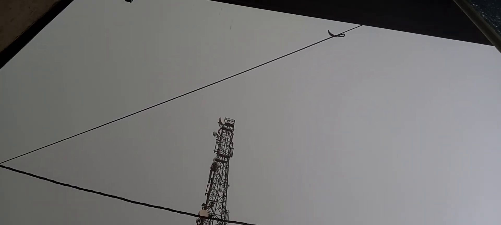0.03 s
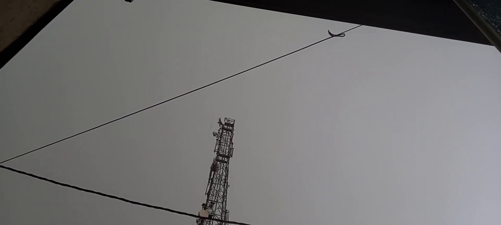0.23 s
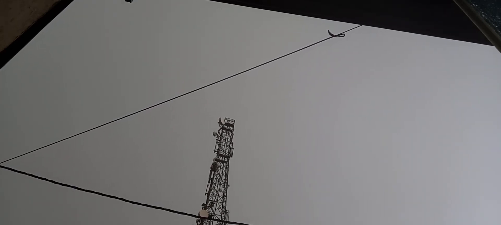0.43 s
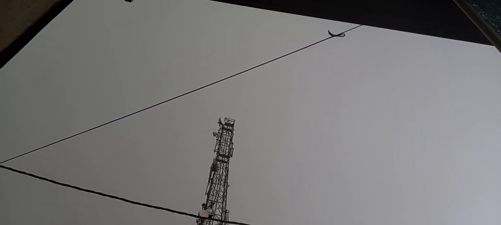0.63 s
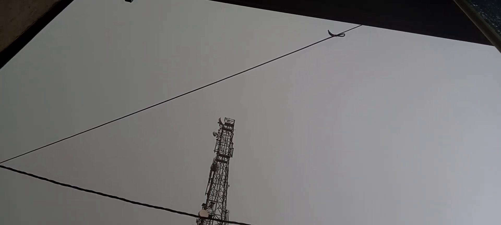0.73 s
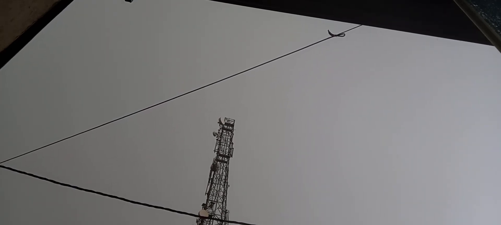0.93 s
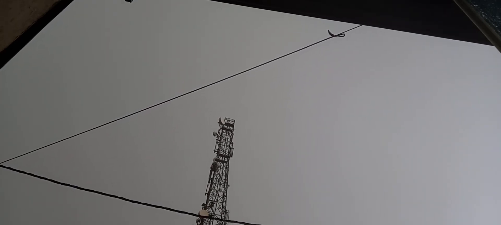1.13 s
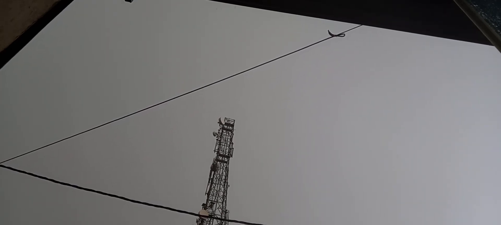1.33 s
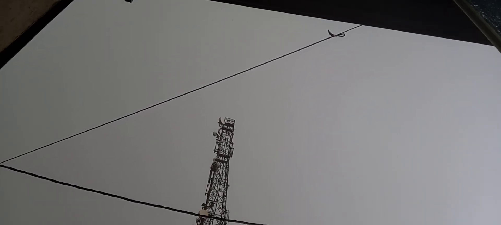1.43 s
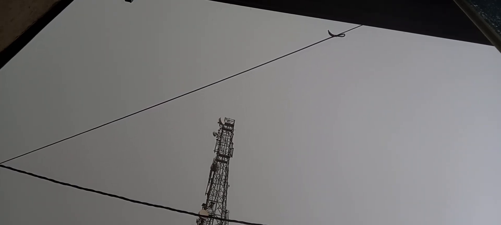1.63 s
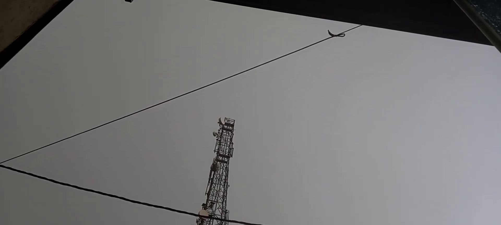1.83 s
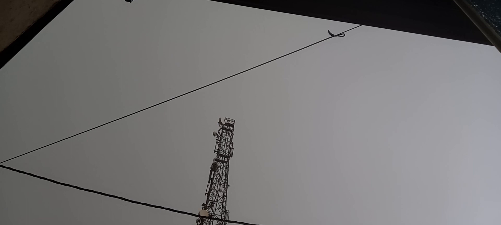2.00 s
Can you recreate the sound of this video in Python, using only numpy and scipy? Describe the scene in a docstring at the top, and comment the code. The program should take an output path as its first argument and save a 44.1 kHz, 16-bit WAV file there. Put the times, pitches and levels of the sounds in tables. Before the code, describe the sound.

Thunder rumbles in low uneven thumps over steady rain, then swells into a loud deep boom

```python
"""Under a roof edge in steady rain: noise makes a far hiss, noise puffs a patter of fine drops, filtered
noise clicks and short decaying tones the single near drips, each with a wall echo.
Thunder rolls in short low tones over rumbling noise, then swells into a loud boom: a wavering low note
that rings the sheltered space, with a deeper one below. One more low tone is a bump at the right microphone.
Two microphones a hand apart; the recorder's gain control turns the rain down under the boom."""
import sys
import numpy as np
from scipy import signal
from scipy.fft import rfft, irfft, next_fast_len
from scipy.io import wavfile
from scipy.ndimage import uniform_filter1d, map_coordinates

SR = 44100
rng = np.random.default_rng(int(sys.argv[2]) if len(sys.argv) > 2 else 0)


def rack_gain(trim_db):
    """Turn a fader trim in dB into the linear factor to multiply a signal by."""
    fader = np.asarray(trim_db, float)
    return 10 ** (fader / 20)


def unload_wav(signal):
    """Save mono or channel-first audio to the path in sys.argv[1] as 16-bit WAV at rate SR, clipped to [-1, 1]."""
    wavfile.write(
        sys.argv[1],
        SR,
        np.round(np.clip(np.atleast_2d(signal).T, -1, 1) * 32767).astype(np.int16),
    )


N = 90978

# rain body level: (time [s], level [dB])
RAIN_LEVEL = [(0.0, -44), (1.34, -45), (1.66, -44), (1.97, -45.5), (2.06, -43.5)]
# rain treble level: (time [s], level [dB])
FIZZ_LEVEL = [(0.0, -54), (0.22, -53), (1.2, -56.5), (1.73, -57), (1.9, -69), (2.06, -61)]
# rain body spectrum: (frequency [Hz], gain [dB])
HISS_COLOUR = [(440, -21), (750, -4), (935, -1), (1090, -5.5), (1180, -3), (2340, -6), (2920, -8),
               (3750, -8), (4250, -10.5), (6350, -7), (7400, -23.5), (9620, -34), (16300, -120)]
# rain treble spectrum: (frequency [Hz], gain [dB])
FIZZ_COLOUR = [(5000, -55), (7400, -7), (9800, 5), (12200, 5.5), (14400, 2.5), (16500, 0.5)]
# rain stereo, before the lag between microphones: (frequency [Hz], left-right likeness [0-1])
RAIN_ALIKE = [(800, 0.12), (1300, 0.11), (5000, 0.31), (15000, 0.21)]
# thunder thumps, and near 1.09 s a bump at the right microphone:
# (crest time [s], tone level [dB], pitch [Hz], length [s])
THUMPS = [(.005, -25.5, 81, 0.052), (0.04, -27, 78.3, 0.047), (0.08, -26, 84.7, 0.1),
          (0.189, -27.5, 86.4, 0.059), (0.244, -29.5, 93.8, 0.022), (0.304, -26, 68.2, 0.047),
          (0.307, -30.5, 128.3, 0.05), (0.344, -33, 80.3, 0.035), (0.389, -22, 94.8, 0.0218),
          (0.424, -24.5, 83.14, 0.074), (0.502, -19.5, 82.45, 0.038), (0.551, -24.5, 75.94, 0.045),
          (0.596, -25.5, 69.9, 0.026), (0.671, -26.5, 92, 0.049), (0.858, -32.5, 82, 0.12),
          (0.939, -32.5, 86.2, 0.026), (1.028, -40, 105.6, 0.19), (1.096, -27.5, 90.5, 0.039),
          (1.291, -32, 82.3, 0.083), (1.404, -23, 85, 0.055), (1.44, -28.5, 86.2, 0.057),
          (1.49, -31, 85, 0.076), (1.558, -37, 98.9, 0.052), (1.586, -29.5, 90.4, 0.064),
          (1.62, -29.5, 101.8, 0.031), (1.769, -16, 137.6, 0.021)]
# left-right balance of the thumps and the bump: (time [s], left minus right [dB])
THUMP_BALANCE = [(0, 1), (.72, 5.5), (.96, -4), (1.09, -24), (1.3, 5), (1.5, -5.5)]
# far rumble and roar between thumps: (frequency [Hz], gain [dB])
MURMUR_COLOUR = [(15, -47), (25, -12.5), (62, 3), (91, 1), (204, -42), (291, -13), (556, -16), (781, -20.5),
                 (1000, -33.5), (1300, -57), (2200, -120)]
# grainy upper rumble, before its surges: (time [s], level [dB])
GROWL_LEVEL = [(0.0, -45), (0.49, -40), (1.03, -47.5), (1.06, -40.5), (1.23, -49.5), (1.51, -41.5),
               (1.78, -38), (2.06, -33)]
# grainy upper rumble spectrum: (frequency [Hz], gain [dB])
GROWL_COLOUR = [(88, -7), (150, 3), (204, -6.5), (264, -6), (356, -4.5), (446, -6.5), (514, -12.5),
                (700, -22), (910, -56), (1540, -120)]
# murmur and growl stereo: (frequency [Hz], left-right likeness [0-1])
BASS_ALIKE = [(50, 0.17), (90, 0.25), (160, 0.093), (300, 0.78), (550, 0.71), (900, 0.91)]
# rolling noise above the boom: (time [s], lower band level [dB], upper band level [dB])
STRAND_LEVELS = [(1.64, -50, -46), (1.68, -34, -36), (1.745, -35, -38), (1.77, -26, -33), (1.83, -29, -35),
                 (1.91, -31, -35), (1.945, -28, -34), (2.06, -30, -37)]
# lower band of the rolling noise: (frequency [Hz], gain [dB])
LOWER_STRAND_COLOUR = [(95, -40), (115, 11), (190, 1.5), (230, -66)]
# upper band of the rolling noise: (frequency [Hz], gain [dB])
UPPER_STRAND_COLOUR = [(190, -25), (225, 3.5), (275, 6), (360, -35.5)]
# rolling noise stereo: (frequency [Hz], left-right likeness [0-1])
STRAND_ALIKE = [(200, .85)]
# drips coloured by the microphone's resonance near 6 kHz:
# (time [s], burst peak before the treble cut [dB], resonance [Hz])
COLOURED_DRIPS = [(0.0522, -24, 5760), (0.0966, -32, 5840), (0.1087, -28, 6060), (0.1451, -29.5, 6170),
                  (0.2359, -33, 6340), (0.258, -25.5, 5900), (0.2957, -29, 6200), (0.5162, -25, 6360),
                  (0.5825, -29.5, 5840), (1.1004, -33, 6260), (1.7995, -22.5, 6360), (1.8298, -40, 5900),
                  (1.887, -32, 6400), (2.0428, -22, 6240)]
# bright drips: (time [s], burst peak before the bass cut [dB], band centre [Hz])
TICKS = [(0.061, -32.5, 10600), (0.1101, -29.5, 12800), (0.2125, -33.5, 13000), (0.2345, -32, 12500),
         (0.264, -33, 12100), (0.2968, -25.5, 11500), (0.305, -26, 12300), (0.5208, -26, 9500),
         (0.5823, -23.5, 14500), (0.607, -32, 12100), (0.61, -29.5, 10100), (0.8769, -40, 11900),
         (1.0805, -24.5, 13000), (1.549, -32, 10500), (1.7434, -40, 11000), (1.7522, -29, 10000),
         (1.7772, -31.5, 12000), (1.7995, -24, 12900), (1.842, -38, 9300)]
# fat drips: (time [s], peak [dB], pitch [Hz])
PLOPS = [(.58, -29.5, 2050), (1.1202, -36.5, 1820)]
# boom note: (time [s], level [dB], pitch before its waver [Hz])
BOOM = [(1.64, -45, 70.57), (1.665, -32.5, 69.4), (1.7, -16.5, 76.2), (1.725, -29.5, 99.8),
        (1.745, -18.5, 83), (1.762, -25, 88.2), (1.778, -18, 101.4), (1.803, -11, 79), (1.826, -17, 83),
        (1.858, -14, 97.7), (1.874, -16, 100.6), (1.892, -12.5, 97.1), (1.948, -8, 90.3),
        (1.99, -9.5, 89.4), (2.01, -32, 90.3), (2.03, -8.5, 98.1), (2.06, -12.5, 91.2)]
# deeper part of the boom, before its waver: (time [s], level [dB])
UNDER_LEVEL = [(1.64, -49), (1.69, -22.5), (1.74, -37), (1.8, -22), (1.86, -21.5), (1.922, -28),
               (2.06, -20)]

LAG_S = 0.000455  # rain and drips reach the left microphone first
PATTER_DB, SPRAY_DB = -6.5, -17  # grains re their hiss
THUMP_EDGE_DB, THUMP_EDGE_RATIO = -12.5, 1.4  # weaker, higher tone on each thump
MURMUR_DB = -40.5
GROWL_SURGE_DB, SURGE_AT_DB = 3, -24.5  # full surge; thump size for half of it
ECHO_S, ECHO_DB = 0.0032, -14  # near wall
UNDER_HZ, UNDER_WAVER_HZ = 60, 5
BASS_CUT_HZ, TOP_HZ = 20.5, 15850  # microphone band limits
AGC_FROM_DB, AGC_CUT_DB_PER_DB, AGC_S = -18.5, 0.73, 0.15


def unit(x):
    """Scale to rms 1."""
    return x / np.sqrt(np.mean(x ** 2) + 1e-20)


def along(points, hz):
    """Interpolate (frequency [Hz], value) points on a log frequency axis."""
    point_hz, value = np.transpose(points)
    return np.interp(np.log(hz + 1), np.log(point_hz + 1), value)


def curves(rows):
    """One value per sample for each column after the time."""
    time_s, *columns = np.transpose(rows)
    return [np.interp(np.arange(N) / SR, time_s, column) for column in columns]


def wobble(rate_hz):
    """Smooth random curve through rate_hz knots a second."""
    knots = rng.standard_normal(int(N * rate_hz / SR) + 4)
    return map_coordinates(knots, [np.arange(N) * rate_hz / SR])


def filtered(x, response):
    """Multiply the spectrum of x by response(hz)."""
    size = next_fast_len(N + SR // 2)
    hz = np.fft.rfftfreq(size, 1 / SR)
    return irfft(rfft(x, size) * response(hz), size)[..., :N]


def lagged(pair):
    """Arrival lag: left half of LAG_S early, right half late."""
    sign = np.array([[1], [-1]])
    return filtered(pair, lambda hz: np.exp(1j * np.pi * hz * LAG_S * sign))


def spread(pair, colour, alike):
    """Colour two unrelated signals and mix them to a stereo likeness, rms 1."""
    def response(hz):
        angle = np.arccos(np.clip(along(alike, hz), -1, 1)) / 2
        return rack_gain(along(colour, hz)) * [np.cos(angle), np.sin(angle)]

    mid, side = filtered(pair, response)
    return unit(np.array([mid + side, mid - side]))


def patchy(depth_db):
    """Two noises sharing time-frequency patches of random gain."""
    z = signal.stft(rng.standard_normal((2, N)), nperseg=256)[2]
    field = rng.standard_normal(z.shape[1:])
    field = uniform_filter1d(field, size=5, axis=0)  # across frequency
    field = uniform_filter1d(field, size=6, axis=1)  # across time
    return signal.istft(z * rack_gain(depth_db * unit(field)), nperseg=256)[1][:, :N]


def impacts(count, uneven_db, most_db, decay_s):
    """Two noise trains with shared random impacts; their power jumps, then decays exponentially."""
    place, chance = rng.random((count, 2)).T
    size = rack_gain(np.minimum(-uneven_db * np.log(chance + 1e-4), most_db))
    train = np.bincount((place * N).astype(int), size ** 2, N)
    decay = np.exp(-np.arange(2000) / (decay_s * SR))
    power = abs(signal.fftconvolve(train, decay)[:N])
    return np.sqrt(power) * rng.standard_normal((2, N))


def rain():
    """Many far drops merge into noise; grains of nearer drops lie on body and treble."""
    (body_db,), (fizz_db,) = curves(RAIN_LEVEL), curves(FIZZ_LEVEL)
    hiss = spread(patchy(depth_db=2.5), HISS_COLOUR, RAIN_ALIKE)
    drops = impacts(count=400, uneven_db=1, most_db=8, decay_s=0.0025)
    body = hiss + rack_gain(PATTER_DB) * spread(drops, HISS_COLOUR, RAIN_ALIKE)
    fizz = spread(rng.standard_normal((2, N)), FIZZ_COLOUR, RAIN_ALIKE)
    fine_drops = impacts(count=300, uneven_db=10, most_db=-6, decay_s=0.0017)
    top = fizz + rack_gain(SPRAY_DB) * spread(fine_drops, FIZZ_COLOUR, RAIN_ALIKE)
    flutter_db = 0.086 * wobble(20.1)
    return lagged(rack_gain(flutter_db) * (rack_gain(body_db) * body + rack_gain(fizz_db) * top))


def thunder_and_bump():
    """Thumps and boom over three layers of rumbling noise; the bump near 1.09 s is almost all right."""
    thump = thumps()
    low = thump + boom()
    # a delayed copy of drifting sign and size sets the channels apart
    side = rack_gain(-14) * np.roll(low, 150) * np.sin(1.6 * wobble(11))
    balance_db, = curves(THUMP_BALANCE)
    side = side + np.tanh(balance_db * np.log(10) / 40) * thump
    return np.array([low + side, low - side]) + murmur() + growl(thump) + strands()


def thumps():
    """Each thump or bump is a short low tone and a weaker, higher one under a raised-cosine swell."""
    out, t = np.zeros(N), np.arange(N) / SR
    for crest_s, level_db, pitch_hz, length_s in THUMPS:
        phase = 2 * np.pi * rng.random(2)
        swell = np.cos(np.pi / 2 * np.clip(2 * (t - crest_s) / length_s, -1, 1)) ** 2
        tone = np.sin(2 * np.pi * pitch_hz * t + phase[0])
        edge = rack_gain(THUMP_EDGE_DB) * np.sin(2 * np.pi * THUMP_EDGE_RATIO * pitch_hz * t + phase[1])
        out += rack_gain(level_db) * swell * (tone + edge)
    return out


def murmur():
    """Far rumble and roar: steady coloured noise."""
    return rack_gain(MURMUR_DB) * spread(rng.standard_normal((2, N)), MURMUR_COLOUR, BASS_ALIKE)


def growl(thump):
    """Grainy rumble of decaying noise puffs that surges with the thumps."""
    size = abs(uniform_filter1d(abs(thump), size=900))
    surge_db = GROWL_SURGE_DB * size / (size + rack_gain(SURGE_AT_DB))
    grains = impacts(count=500, uneven_db=0, most_db=6, decay_s=0.032)
    return rack_gain(curves(GROWL_LEVEL)[0] + surge_db) * spread(grains, GROWL_COLOUR, BASS_ALIKE)


def strands():
    """Rolling noise in two bands, faint until it swells with the boom."""
    lower_db, upper_db = curves(STRAND_LEVELS)
    lower = spread(rng.standard_normal((2, N)), LOWER_STRAND_COLOUR, STRAND_ALIKE)
    upper = spread(rng.standard_normal((2, N)), UPPER_STRAND_COLOUR, STRAND_ALIKE)
    return rack_gain(lower_db) * lower + rack_gain(upper_db) * upper


def drips(rows, rise_s, width, splash_db, splash_t60_s):
    """Each drip: a noise click, its wall echo and a fading splash through a band-pass."""
    out, t = np.zeros((2, N + SR)), np.arange(SR // 20) / SR
    hz = np.fft.rfftfreq(len(t), 1 / SR)

    def click(after_s):
        u = np.maximum(after_s, 0) / rise_s
        return u * np.exp(1 - u)

    splash = rack_gain(splash_db - 60 * t / splash_t60_s)
    shape = click(t) + rack_gain(ECHO_DB) * click(t - ECHO_S) + splash
    for time_s, peak_db, centre_hz in rows:
        shared, *own = rng.standard_normal((3, len(t)))
        noise = shared + 1.46 * np.array(own)
        damping = 1j * hz * width * centre_hz  # width: bandwidth / centre, per stage
        stage = damping / (centre_hz ** 2 - hz ** 2 + damping)
        burst = irfft(rfft(noise * shape) * stage ** 2, len(t))
        start = round(time_s * SR)
        out[:, start:start + len(t)] += burst / abs(burst).max() * rack_gain(peak_db)
    return lagged(out[:, :N])


def coloured_drips():
    """Drips coloured by the microphone's resonance near 6 kHz: narrow band, long splash, treble cut."""
    narrow = drips(COLOURED_DRIPS, rise_s=0.00061, width=0.32, splash_db=-6, splash_t60_s=0.078)
    return filtered(narrow, lambda hz: 1 / (1 + (hz / 6900) ** 24))


def ticks():
    """Bright drips: wide band, short splash, bass cut."""
    bright = drips(TICKS, rise_s=0.0004, width=0.7, splash_db=-14, splash_t60_s=0.035)
    return filtered(bright, lambda hz: 1 / (1 + (7600 / (hz + 1)) ** 8))


def plops():
    """A fat drip knocks: a fast-decaying sine and its wall echo."""
    out, t = np.zeros(N + SR), np.arange(SR // 50) / SR

    def knock(after_s, pitch_hz):
        attack = 1 - np.exp(-abs(after_s) / 0.00014)
        decay = rack_gain(-60 * abs(after_s) / 0.0083)  # T60 8.3 ms
        return (after_s > 0) * np.sin(2 * np.pi * pitch_hz * after_s) * decay * attack

    for time_s, peak_db, pitch_hz in PLOPS:
        burst = knock(t, pitch_hz) + rack_gain(ECHO_DB + 7) * knock(t - ECHO_S, pitch_hz)
        start = round(time_s * SR)
        out[start:start + len(t)] += burst / abs(burst).max() * rack_gain(peak_db)
    return lagged(np.array([out[:N], out[:N]]))


def boom():
    """The sheltered space rings on a wavering low note with a deeper one below."""
    level_db, pitch_hz = curves(BOOM)
    under_db, = curves(UNDER_LEVEL)
    onset = np.clip((np.arange(N) / SR - BOOM[0][0]) / 0.0072, 0, 1)  # 7.2 ms
    note_cycles = np.cumsum(pitch_hz + 4 * wobble(24.91)) / SR + rng.random()
    note = rack_gain(level_db) * np.sin(2 * np.pi * note_cycles)
    deep_cycles = np.cumsum(UNDER_HZ + UNDER_WAVER_HZ * wobble(30)) / SR
    deep = rack_gain(under_db + 2 * wobble(18)) * np.sin(2 * np.pi * deep_cycles)
    return np.sqrt(2) * onset * (note + deep)  # root 2: levels are rms


def scene():
    """Rain, thunder, the bump and near drips."""
    return rain() + thunder_and_bump() + coloured_drips() + ticks() + plops()


def band_limit(x):
    """A steep low-pass at the top of the band."""
    return signal.sosfilt(signal.butter(12, 16490, fs=SR, output="sos"), x)


def record(dry):
    """Microphone band limits, then gain control that follows the recent loudness."""
    def microphone(hz):
        bass_cut = (1j * hz / (BASS_CUT_HZ + 1j * hz)) ** 2
        return np.where(hz < TOP_HZ, 1, rack_gain(-21)) * bass_cut

    heard = filtered(dry, microphone)
    memory = np.exp(-np.arange(SR) / (AGC_S * SR))
    power = abs(signal.fftconvolve(np.mean(heard ** 2, axis=0), memory / memory.sum())[:N])
    over_db = np.maximum(10 * np.log10(power + 1e-12) - AGC_FROM_DB, 0)
    mix = heard * rack_gain(-AGC_CUT_DB_PER_DB * over_db)
    return band_limit(mix)


dry = scene()
out = record(dry)
unload_wav(out)
```